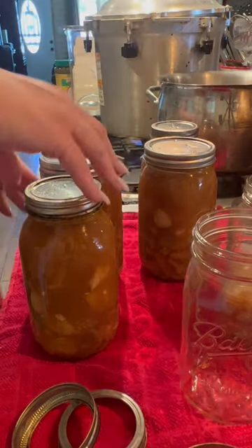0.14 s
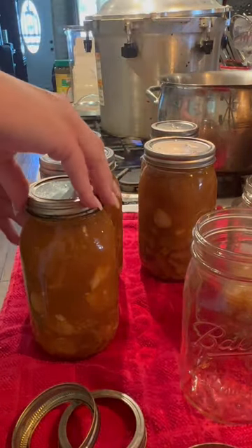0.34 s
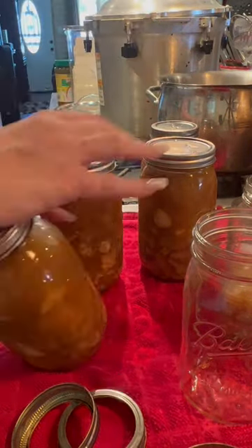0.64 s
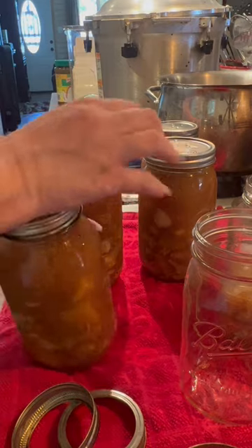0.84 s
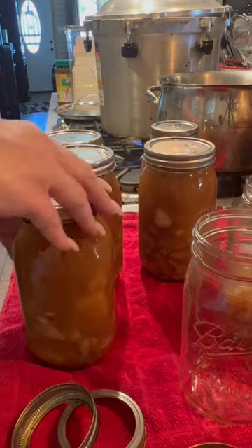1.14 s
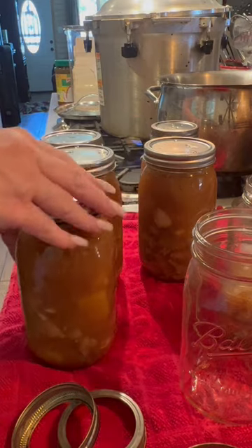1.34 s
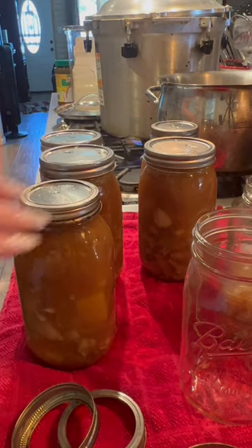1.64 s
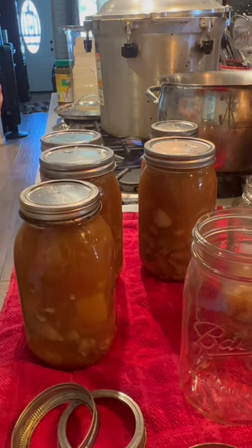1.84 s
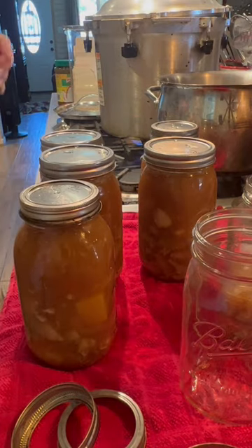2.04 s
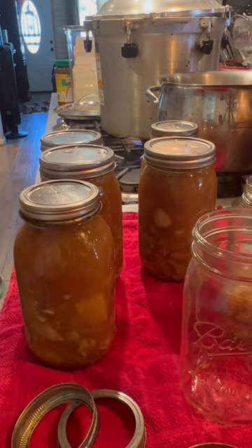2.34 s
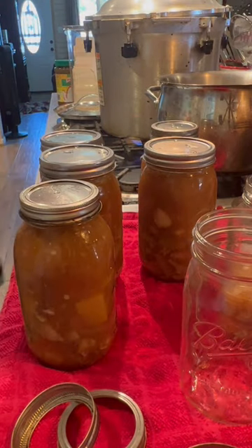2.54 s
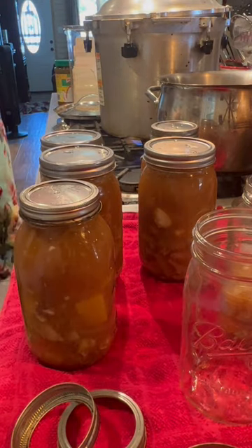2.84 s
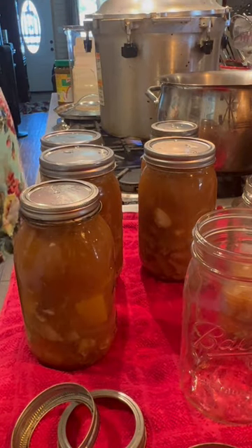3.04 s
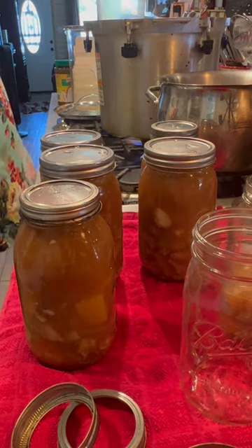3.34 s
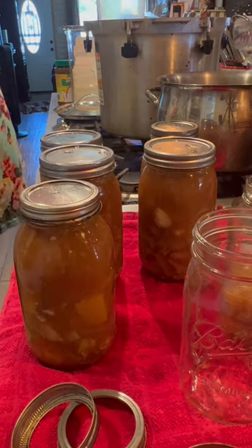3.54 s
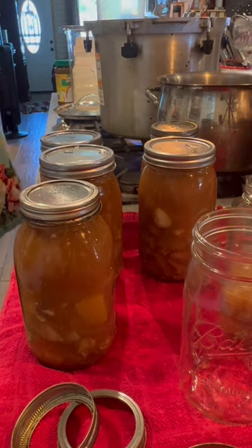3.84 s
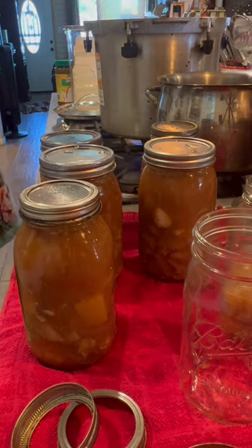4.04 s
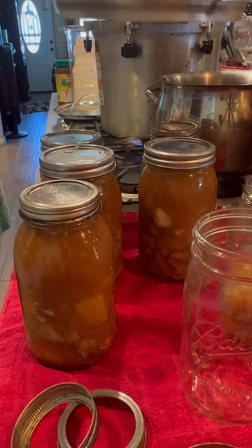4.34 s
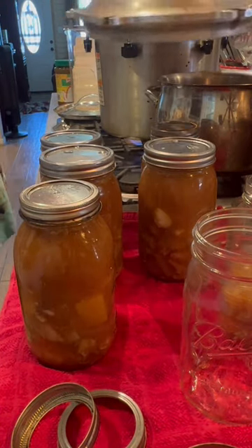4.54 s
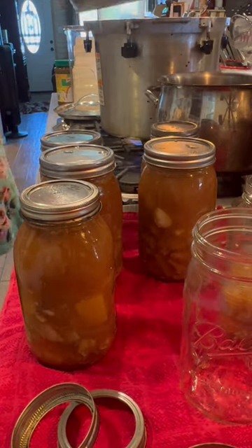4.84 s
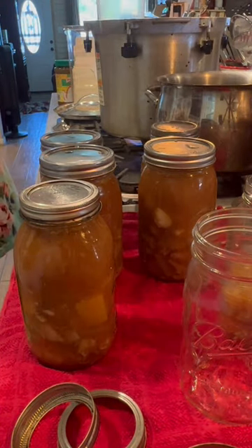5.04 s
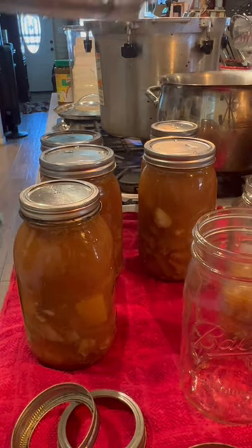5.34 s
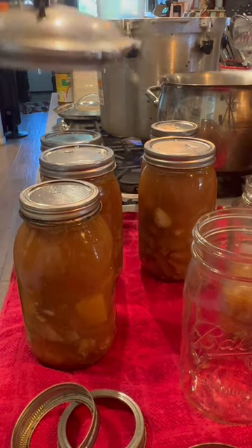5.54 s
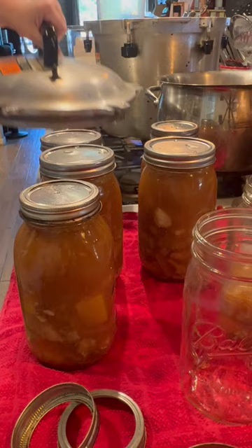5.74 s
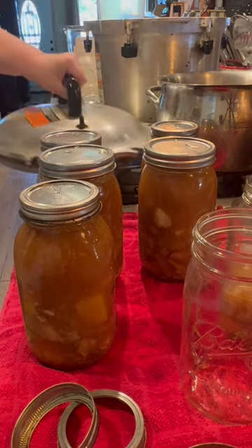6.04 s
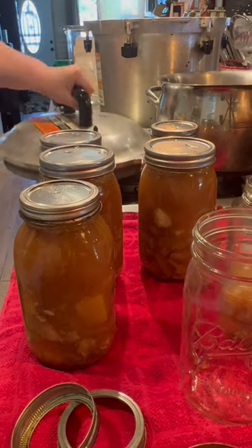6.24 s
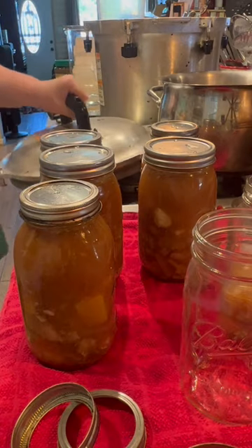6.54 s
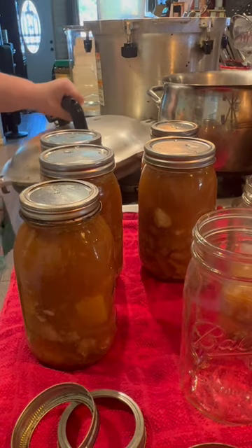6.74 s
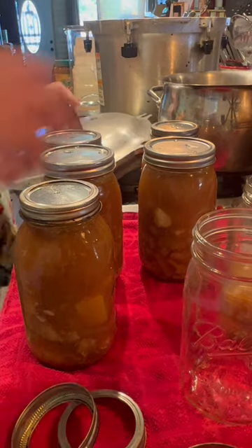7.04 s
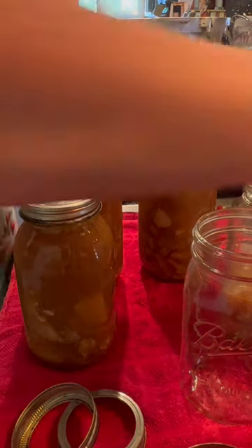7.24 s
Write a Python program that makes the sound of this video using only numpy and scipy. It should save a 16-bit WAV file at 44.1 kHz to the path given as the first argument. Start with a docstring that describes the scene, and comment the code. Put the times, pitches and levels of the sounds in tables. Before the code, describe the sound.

In a small kitchen, fingers click a full glass jar's lid, a big canner lid rings out, then bangs and rattles to rest.

```python
"""The heavy lid of a pressure canner is lifted, clangs on the pot and clatters down on the stove.
Before that a full jar is handled: its metal lid and screw band click, faint squeaks sound and clothes rustle.
Knocks are bursts of fading noise plus dying tones; cloth, two dull taps and squeaks are shaped noise.
Two motor tones beat slowly over steady hum and airy noise, and a small hard room adds a short echo."""
import sys
import numpy as np
from scipy import signal
from scipy.fft import rfft, irfft, next_fast_len
from scipy.io import wavfile
from scipy.ndimage import uniform_filter1d

SR = 44100
rng = np.random.default_rng(int(sys.argv[2]) if len(sys.argv) > 2 else 0)


def pcm_store(signal):
    """Save signal as 16-bit PCM."""
    levels = np.round(np.clip(np.atleast_2d(signal), -1, 1) * 32767)
    wavfile.write(sys.argv[1], SR, levels.astype(np.int16).T)


N = 326323
TIME = np.arange(N) / SR  # seconds since the scene began
AGE = np.arange(SR) / SR  # seconds since a knock; each knock is given one second

# how alike steady sounds are at left and right: pitch_hz, likeness (1 = identical)
AIR_LIKENESS = [(60, 1.0), (150, 0.94), (380, 0.85), (950, 0.23), (2380, 0.71), (5980, 0.31),
                (15000, 0.085)]
# how alike knocks and squeaks are at left and right: pitch_hz, likeness (1 = identical)
HIT_LIKENESS = [(150, 1), (300, 0.97), (600, 0.48), (1300, 0.59), (3000, 0.77), (9000, 0.26)]
# the canner lid knocks on pot and stove, levels before each layer's trim:
# start_s, thud_db, clank_db, clank_tilt_db_per_octave, tick_db
LID_KNOCKS = [(3.025, -33, -61, -25, -80), (3.047, -34, -32.5, -9, -63), (3.061, -46, -25, -7.5, -54),
              (3.128, -58, -42, -4.5, -66), (5.967, -24.5, -47.5, 3.5, -30.5),
              (6.191, -33.5, -51.5, 12, -35), (6.242, -22.5, -19.5, -1, -48.5),
              (6.258, -25, -48, 11.5, -45), (6.301, -25.5, -27.5, 4, -36.5), (6.387, -18, -18.5, 0.5, -46),
              (6.402, -21, -24, -13, -48), (6.541, -20, -29, -3, -53.5), (6.548, -25, -42.5, 0.5, -47.5),
              (6.690, -45, -68, 5, -63.5), (6.933, -54, -46.5, -6, -69), (6.967, -22.5, -29.5, -8, -53.5),
              (7.296, -48, -44.5, -6.5, -89)]
# the lifted lid strikes the pot and chatters, levels before trim: start_s, dull_blow_db, bright_crash_db
CLANGS = [(4.2916, -14.5, -32), (4.300, -23, -21), (4.316, -26, -25.5), (4.330, -33.5, -26),
          (4.377, -26, -40), (4.428, -33.5, -46), (4.487, -32.5, -46.5)]
# clear tones of pot and hanging lid: pitch_hz, level_db, time_to_fade_60_db_s,
# twin_share (its sign may flip the twin), twin_offset_hz
POT_TONES = [(61.4, -5.5, 0.34, 0, 0), (143, -11.5, 1.2, 0, 0), (151, -12, 1.4, 0.18, 0),
             (341.4, 4.5, 0.3, 0.3, 3.5), (366, -5, 0.38, -0.27, 0), (554, -14.5, 0.37, 0.2, -2.5),
             (637, -25.5, 0.252, 0.075, 1), (1108, -24, 0.99, 0, 0), (493, -2.5, 1.02, .7, .8),
             (1492, -16.5, 1.7, -.85, 1.55), (2702, -15, .42, -.4, 6), (3967, -7, .3, -.9, 11),
             (4834, -12, .33, -.4, 9), (8123, -11, .24, .4, 17), (1812, -5, 0.12, 0.11, 28),
             (2640, -23, 0.88, -.5, 5.5), (3440, -23.5, 0.61, -0.07, 0), (4423, -14, 0.46, 0.35, 37.5),
             (4970, -18, 0.26, -0.18, -1), (5100, -18, .25, 0.12, 0), (5460, -18, 0.23, 0, 0),
             (5815, -19, 0.42, -0.58, 9), (6514, -22, 0.54, -0.22, -4), (7154, -19, .25, -0.4, 2),
             (7330, -19.5, 0.22, -0.36, 1), (7600, -17, 0.23, -0.54, -1), (10100, -22, 0.213, 0.36, 0),
             (11600, -26, .2, 0, 0), (11680, -12.5, .22, -.5, 28)]
SETTLE_S, SETTLE_DB_PER_S = 6.24, 28.5  # from this time the stove damps the low tones as the lid settles


def amp(db):
    """Turns decibels into a gain."""
    return 10 ** (np.asarray(db) / 20)


def evened(x):
    """Scales a signal to an average (rms) level of one."""
    return x / np.sqrt(np.mean(x ** 2) + 1e-20)


def read(points, hz):
    """Reads a table between its points, with pitch spaced as the ear hears it (logarithmically)."""
    f, value = np.transpose(points)
    return np.interp(np.log(hz + 1), np.log(f + 1), value)


def add(mix, s, sound):
    """Mixes a sound in at time s, cut off at the end of the scene."""
    part = mix[:, round(s * SR):][:, :sound.shape[1]]
    part += sound[:, :part.shape[1]]


def noise(size, spectrum, likeness, tilt=0, bumps=()):
    """Coloured noise of rms one; a shared and an opposed part make left and right partly alike."""
    hz = np.fft.rfftfreq(size, 1 / SR)
    common, apart = rfft(rng.standard_normal((2, size)))
    alike = np.clip(read(likeness, hz), -1, 1)
    mid = common * np.sqrt(1 + alike)
    side = apart * np.sqrt(1 - alike)
    db = read(spectrum, hz) + tilt * np.log2(np.maximum(hz, 500) / 500)
    # each bump is a broad resonance: centre, width, height in dB
    db = db + sum(height / (1 + (2 * (hz - f) / width) ** 2) for f, width, height in bumps)
    return evened(irfft(np.array([mid + side, mid - side]) * amp(db), size))


def burst(spectrum, t60, tilt=0, length=1, rise=0.00038, early_db=0, bumps=()):
    """Countless close tones struck at once: noise whose bands each die at their own speed."""
    struck = noise(SR, spectrum, HIT_LIKENESS, tilt, bumps)
    hz, t, z = signal.stft(struck, SR, nperseg=256)
    fade_s = np.maximum(length * read(t60, hz)[:, None], .005)
    early = early_db * (np.exp(-t / 0.054) - .5)  # above zero, the start stands out and drops quickly
    z = z * amp(-60 * t / fade_s + early)
    return signal.istft(z, SR, nperseg=256)[1][:, :SR] * (1 - np.exp(-AGE / rise))


def mode(hz, db, t60, twin=0, split_hz=0, spread=0.36):
    """One dying tone; a round shell can split it into twins that beat."""
    # above the bass, left and right hear it out of step
    out_of_step = spread * min(hz / 500, 1) ** 2 * np.array([[-1], [1]])
    turn = 2 * np.pi * hz * AGE + 2 * np.pi * rng.random() + out_of_step
    pair = np.sin(turn) + twin * np.sin(turn + 2 * np.pi * split_hz * AGE)
    swell = 1 - np.exp(-AGE / (0.00079 + .5 / hz))
    return amp(db - 60 * AGE / t60) * swell * pair


def ring(modes):
    """All the clear tones of one object, sounded together."""
    return sum(mode(*row) for row in modes)


def clusters(modes, share=1):
    """Close tones crowd round each clear upper tone, leaving a peak in the object's noise burst."""
    # crowding at full share: width_hz, height_db
    crowd = (93, 4.85)
    width_hz, height_db = crowd
    return [(hz, width_hz, share * height_db) for hz, *_ in modes if hz > 1400]


def placed(x, lag_ms, balance_db):
    """Places a source off centre by delaying the left side (a negative lag advances it) and by level."""
    size = next_fast_len(N)
    hz = np.fft.rfftfreq(size, 1 / SR)
    delay = np.exp(-2j * np.pi * hz * lag_ms / 10 ** 3)
    left = irfft(rfft(x[0], size) * delay, size)[:N]
    return np.array([left * amp(balance_db / 2), x[1] * amp(-balance_db / 2)])


def appliances(motor_db=-46.5, air_db=-48.5):
    """Two motors of nearly equal speed throb against each other over hum and moving air."""
    # the slower and the faster motor: pitch_hz
    motors_hz = (57.0, 58.733)
    # steady hum tones: pitch_hz, rms_level_db
    hum_tones = [(101.2, -66), (117.5, -56), (120, -58.5), (129.5, -69.5), (138.9, -58), (240, -66.5)]
    # colour of the moving air: pitch_hz, relative_level_db
    air_colour = [(20, -39.5), (37, -17), (60, -5), (87, -10.5), (125, -11), (165, -19.5), (260, -24.5),
                  (520, -25), (1190, -34), (3340, -51.5), (5300, -48.5), (7500, -58.5), (12000, -63),
                  (16000, -72)]
    # broad resonances of the airflow: pitch_hz, width_hz, height_db
    fan_bumps = [(676, 200, 4.5), (2525, 500, 11.5), (5000, 1307, 6.5), (9110, 500, 5)]
    slow, fast = (np.sin(2 * np.pi * hz * TIME) for hz in motors_hz)
    motors = amp(motor_db) * np.sqrt(2) * (slow - 0.92 * fast)
    hum = sum(amp(db) * np.sqrt(2) * np.sin(2 * np.pi * (hz * TIME + rng.random())) for hz, db in hum_tones)
    air = amp(air_db) * noise(N, air_colour, AIR_LIKENESS, bumps=fan_bumps)
    return motors + hum + air


def soft_strokes(t, stir_db=-71.5, stir_tilt=-3.4):
    """Each soft sound swells, holds and dies away; gives the joint level in dB and tilt in dB per octave."""
    # cloth brushes, two dull handling taps (1.799 and 2.792 s) and the short airy tail of a jar click
    # (0.457 s): start_s, rise_s, hold_s, level_db, tilt_db_per_octave
    strokes = [(0.457, 0.026, .01, -55.5, 7.5), (0.583, 0.031, 0.14, -57.5, 1.5),
               (1.04, 0.023, .01, -67, 5), (1.222, 0.064, .02, -53, 2), (1.457, 0.11, .02, -65, 2),
               (1.799, 0.0034, 0.0053, -50.5, -3.5), (1.8, 0.027, .06, -55.5, 0.5),
               (1.931, 0.045, .005, -51.5, 0), (2.137, 0.04, 0.0056, -48, 1.5),
               (2.397, .02, .005, -60.5, -0.5), (2.517, 0.076, .005, -62, 0),
               (2.792, 0.0045, .005, -52.5, -2.5), (2.79, .13, 0.09, -52, 0.5), (5.597, 0.039, 0.1, -55, 0),
               (7.267, .05, .08, -65, 2.5)]
    power = np.full(len(t), amp(stir_db) ** 2)  # clothes never quite at rest
    tilted = power * stir_tilt
    for start, rise, hold, db, tilt in strokes:
        fade_s = 0.15 + 6.8 * rise  # time to fade 60 dB: the slower the swell, the slower the fade
        fade_db = 60 * np.maximum(t - start - rise - hold, 0) / fade_s
        stroke = (np.clip((t - start) / rise, 0, 1) * amp(db - fade_db)) ** 2
        power = power + stroke
        tilted = tilted + stroke * tilt
    return 10 * np.log10(power), tilted / power


def cloth(grain_db=0.0, grain_hz=300, patchy_db=3):
    """Rubbing cloth makes patchy noise, each fold with its own colour; taps and an airy tail share it."""
    # colour of rubbing cloth: pitch_hz, relative_level_db
    cloth_colour = [(150, -11), (500, 2.5), (1200, 3), (2200, 1.5), (3500, -1.5), (5000, -5), (8000, -5.5),
                    (11000, -15.5), (16000, -15.5)]
    db, tilt = soft_strokes(TIME)
    hz, t, z = signal.stft(noise(N, cloth_colour, AIR_LIKENESS), SR, nperseg=256)
    folds = uniform_filter1d(rng.standard_normal(z.shape[1:]), size=4, axis=0)
    folds = evened(uniform_filter1d(folds, size=4, axis=1))
    octaves = np.log2(np.maximum(hz, 500) / 3000)[:, None]
    z = z * amp(np.interp(t, TIME, tilt) * octaves + patchy_db * folds - 1.5)
    # optional fine level flutter; at 0 dB it has no effect
    grains = np.interp(TIME * grain_hz, np.arange(N), rng.standard_normal(N))
    return signal.istft(z, SR, nperseg=256)[1][:, :N] * amp(db + grain_db * grains)


def jars(snap_db=3, snap_length=0.31, glass_db=-15):
    """A hard snap, a rattle of the thin band and a glass ring, louder and longer when loosely held."""
    # fingers on the jars, level before the layers' trims and looseness as a factor on fading time:
    # start_s, level_db, tilt_db_per_octave, looseness
    jar_clicks = [(.338, -49.5, 2, 0.29), (.432, -38, -4.5, 1.2), (0.446, -42.5, 8, 1),
                  (.469, -30.5, 6.5, 0.59), (.588, -48, 22, .35), (.683, -48, -16.5, 1),
                  (0.831, -54.5, 2, 0.39), (.898, -56.5, -2, 0.52), (.955, -61, -5, .4),
                  (1.047, -56.5, 13, .8), (1.205, -58, 2, .4), (1.226, -53, 6, 0.72),
                  (1.235, -42, 2.5, 1.6), (1.243, -54, -2, 3.9), (1.278, -53, 0, 1.8),
                  (7.343, -57.5, 3, 1.2)]
    # colour of a click: pitch_hz, relative_level_db
    click_colour = [(500, -26), (1200, -17), (2000, -4.5), (3000, 0), (4800, 3.5), (7500, -3.5),
                    (10000, -7.5), (14000, -13.5), (16500, -26)]
    # fading of a click before looseness scales it: pitch_hz, time_to_fade_60_db_s
    click_fade = [(1500, 0.18), (5000, 0.076), (14000, 0.12)]
    # clear tones of the jar, before looseness: pitch_hz, relative_level_db, time_to_fade_60_db_s
    jar_tones = [(1844, -13, 0.39), (2860, -6, 0.19), (3830, -9.5, 0.17), (4730, -5, 0.22), (5080, 5, 0.15),
                 (5840, -13, 0.093), (6815, -11, 0.81), (6950, -19, 0.54), (7870, -4, .3), (8296, -2, 0.6),
                 (8700, -7.5, 0.34), (11200, -20, .2)]
    out = np.zeros((2, N))
    for s, db, tilt, loose in jar_clicks:
        snap = amp(snap_db) * burst(click_colour, click_fade, tilt, snap_length * loose, rise=0.0002)
        rattle = amp(-1.5) * burst(click_colour, click_fade, tilt, loose, bumps=clusters(jar_tones, share=1.2))
        held = [(hz, level, t60 * min(loose / 2, 1)) for hz, level, t60 in jar_tones]
        glass = amp(glass_db) * loose * ring(held)
        add(out, s, amp(db) * (snap + rattle + glass))
    return placed(out, lag_ms=-0.0034, balance_db=0.0)


def squeaks():
    """Skin and rubber stick and slip on metal: faint, narrow bands of noise."""
    # squeaks of handling, level before the ends are faded: start_s, length_s, pitch_hz, level_db
    squeak_list = [(.850, .012, 3050, -61), (1.276, 0.02, 1780, -51), (1.781, 0.057, 2150, -58),
                   (1.852, 0.064, 2040, -60), (2.864, .08, 1160, -57), (2.888, 0.058, 3130, -58)]
    out = np.zeros((2, N))
    for s, seconds, hz, db in squeak_list:
        size = round(max(seconds, .005) * SR)
        width = 0.11 * hz
        band = [(hz / 2, -50), (hz - width, -15), (hz, 0), (hz + width, -15), (hz * 2, -50)]
        add(out, s, amp(db) * noise(size, band, HIT_LIKENESS) * signal.windows.tukey(size, .5))
    return out


def lid(body_hz=1000, rim_hz=4200, spot_db=3.0, ring_trim_db=-2):
    """The lid's weight thuds, its rim clanks and grazing contacts tick; each wakes its own range of tones."""
    # colour of the thud: pitch_hz, relative_level_db
    thud_colour = [(20, -41), (40, -22), (80, -9.5), (130, -2.5), (190, -5), (270, -0.5), (400, -3),
                   (620, -7), (850, -15.5), (1300, -25), (2500, -62)]
    # colour of the clank: pitch_hz, relative_level_db
    clank_colour = [(150, -6), (400, -4.5), (670, 5), (1100, -1), (1350, -3.5), (1700, -0.5), (2600, -3),
                    (3200, -6.5), (4100, -4.5), (5500, -16.5), (8000, -24), (11000, -37.5), (16000, -43)]
    # colour of the tick: pitch_hz, relative_level_db
    tick_colour = [(2500, -44.5), (3700, -9), (4400, 0), (5300, 0.5), (7200, -3), (9000, -8), (12500, -14),
                   (16000, -15)]
    # fading of a knock before its length factor: pitch_hz, time_to_fade_60_db_s
    knock_fade = [(100, 0.6), (400, 0.16), (1500, 0.29), (4500, 0.25), (9000, 0.48), (15000, 0.24)]
    # tones of the lid, on pot or stove, before the length factor:
    # pitch_hz, relative_level_db, time_to_fade_60_db_s
    lid_tones = [(61.5, -12, 0.73), (146, 0, 0.65), (153, -2, 1), (184, -5.5, 0.58), (264, -11, 0.3),
                 (405, -13, 0.85), (552, -12, 0.64), (618.4, -10, 0.22), (868, -22, 0.96), (312, -5, .4),
                 (339, -13, .55), (668, -11, .5), (908, -18, .75), (1130, -14, .45), (1502, -11, .45),
                 (1630, -8, .4), (1766, -9, .32), (2530, -17, .28), (4110, -17, .27), (4296, -11, .2),
                 (4624, -9, .2), (1083, -13, 0.53), (2030, -21, 0.22), (2200, -28, 0.52), (2350, -26, 0.14),
                 (2890, -25, 0.4), (4500, -11, 0.15), (6240, -9.5, 0.2), (7316, -26, 0.22)]
    # a glancing knock, more tick than clank, rings longer: length_factor_when_equal, doublings_per_db
    glancing = (1.08, 0.017)
    peaks = clusters(lid_tones, share=0.27)
    tick_peaks = clusters(lid_tones, share=0.73)
    out = np.zeros((2, N))
    for s, thud_db, clank_db, tilt, tick_db in LID_KNOCKS:
        length = glancing[0] * 2 ** (glancing[1] * (tick_db - clank_db))
        ring_db = thud_db + ring_trim_db - SETTLE_DB_PER_S * max(s - SETTLE_S, 0)
        thud = burst(thud_colour, knock_fade, 0.17 * tilt, length, rise=0.0015, early_db=-4.5)
        clank = burst(clank_colour, knock_fade, tilt, length, early_db=-0.5, bumps=peaks)
        tick = burst(tick_colour, knock_fade, length=length, early_db=16.5, bumps=tick_peaks)
        add(out, s, amp(thud_db) * thud)
        add(out, s, amp(clank_db + 0.5) * clank)
        add(out, s, amp(tick_db - 6.0) * tick)
        for hz, db, t60 in lid_tones:
            if hz < body_hz:
                drive_db = ring_db
            elif hz < rim_hz:
                drive_db = clank_db + tilt * np.log2(hz / body_hz) - 4.0
            else:
                drive_db = tick_db
            uneven_db = spot_db * rng.standard_normal()  # depends on the spot struck
            add(out, s, mode(hz, db + drive_db + uneven_db, t60 * length))
    return placed(out, lag_ms=0.0075, balance_db=0.1)


def pot(rebound_db=-7, rebound_above_hz=2000):
    """A heavy blow and quick rebounds; each crash wakes the upper tones of the shell again."""
    # colour of the dull blow: pitch_hz, relative_level_db
    blow_colour = [(20, -44.5), (35, -29), (70, -17), (140, -9.5), (240, 0.5), (350, -1), (540, -2),
                   (700, -9), (1000, -20.5), (2000, -48)]
    # colour of the bright crash: pitch_hz, relative_level_db
    crash_colour = [(530, -57), (900, -33), (1460, -12), (2330, -14), (2660, -13.5), (3680, -18.5),
                    (3910, -3.5), (4250, -13), (5680, -8), (6410, -16.5), (7860, -10.5), (10800, -20),
                    (12000, -15), (15200, -27), (16000, -78)]
    # fading of a clang, shortened for the blow: pitch_hz, time_to_fade_60_db_s
    clang_fade = [(100, 1), (400, 0.18), (1500, 0.67), (5000, 0.34), (9000, 0.35), (15000, .22)]
    out = np.zeros((2, N))
    upper = [row for row in POT_TONES if row[0] > rebound_above_hz]
    peaks = clusters(POT_TONES, share=1.25)
    for s, blow_db, crash_db in CLANGS:
        blow = burst(blow_colour, clang_fade, length=0.52, rise=.0008, early_db=4.5)
        crash = burst(crash_colour, clang_fade, length=1.0, early_db=10.0, bumps=peaks)
        add(out, s, amp(blow_db) * blow)
        add(out, s, amp(crash_db - 3.5) * crash)
        add(out, s, amp(crash_db + rebound_db) * ring(upper))
    return placed(out, lag_ms=0.0093, balance_db=0.1)


def singing(sing_db=-17.5, grip_s=0.27, grip_db_per_s=38):
    """The hanging lid sings on after the first blow; soon the hand damps it."""
    out = np.zeros((2, N))
    level_db = sing_db - grip_db_per_s * np.maximum(AGE - grip_s, 0)
    add(out, CLANGS[0][0], amp(level_db) * ring(POT_TONES))
    return placed(out, lag_ms=0.0093, balance_db=1.3)


def cavity(boom_db=-1, fade_s=0.61, rise_s=.018):
    """Thuds on the stove make the air under the domed lid boom, ever more weakly as the lid settles."""
    # pitch of the air, wavering and then lower as the gap to the stove closes: time_s, pitch_hz
    boom_pitch = [(5.97, 200), (6.016, 157), (6.07, 146), (6.15, 150), (6.2, 176.7), (6.27, 146.8),
                  (6.47, 143.6), (6.62, 140.9), (6.68, 132)]
    power = np.zeros((1, N))
    for s, thud_db, *_ in LID_KNOCKS:
        if s > CLANGS[-1][0]:  # only knocks after the lid has left the pot
            settled_db = SETTLE_DB_PER_S * max(s - SETTLE_S, 0)
            db = thud_db + boom_db - settled_db - 60 * AGE / fade_s
            boom = amp(db) * (1 - np.exp(-AGE / rise_s))
            add(power, s, boom[None] ** 2)
    hz = np.interp(TIME, *np.transpose(boom_pitch))
    return np.sqrt(power) * np.sin(2 * np.pi * np.cumsum(hz) / SR)


def kitchen(x):
    """The short diffuse echo of a small hard room: each sound is smeared by a fading noise burst."""
    # fading of the room: pitch_hz, time_to_fade_60_db_s
    room_fade = [(150, 0.61), (1000, 0.57), (5000, 0.54), (9000, 0.36), (14000, .18)]
    tail = burst([(50, -4), (400, -2), (8000, -2.5), (16000, -9)], room_fade, rise=0.0024)
    return signal.fftconvolve(x, tail / np.linalg.norm(tail[0]), axes=1)[:, :N]


def scene():
    """The jars stand close by; the stove, a little farther back, gets more echo."""
    near = jars()
    far = lid() + pot() + squeaks()
    echo = kitchen(amp(-17.5) * near + amp(-12.0) * far)
    return near + far + singing() + cavity() + echo + cloth() + appliances()


def record(dry, low_cut_hz=38, edge_hz=16200):
    """The recorder's rumble filter takes out the deepest bass; its band limit takes out the top treble."""
    rumble_filter = signal.butter(4, low_cut_hz, "highpass", fs=SR, output="sos")
    lean = signal.sosfilt(rumble_filter, dry)
    band_limit = signal.firwin(511, edge_hz, window=("kaiser", 9), fs=SR)
    return signal.oaconvolve(lean, band_limit[None], "same", axes=1)


dry = scene()
out = record(dry)
pcm_store(out)
```